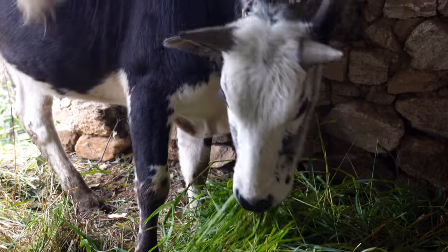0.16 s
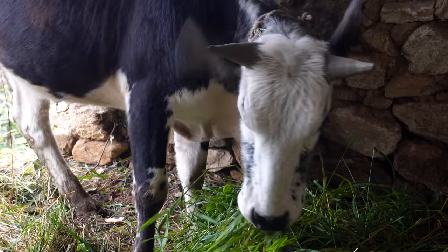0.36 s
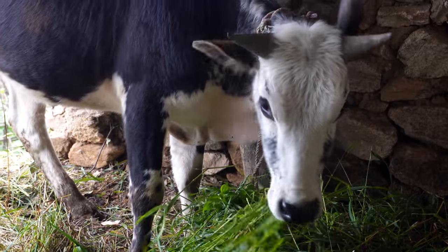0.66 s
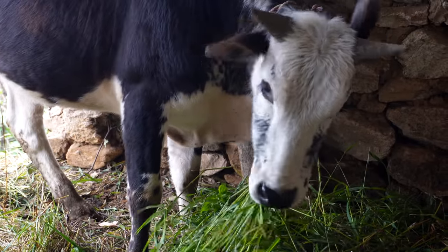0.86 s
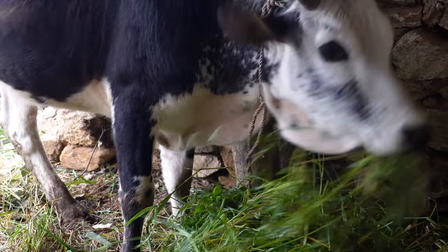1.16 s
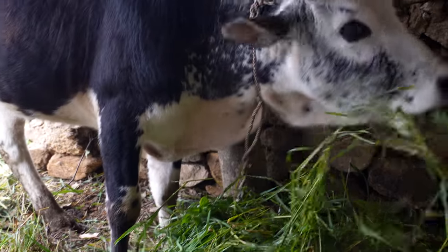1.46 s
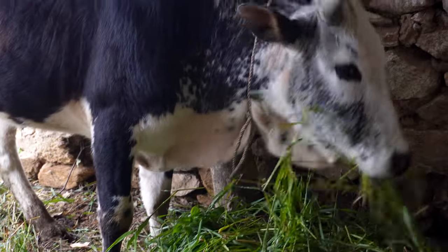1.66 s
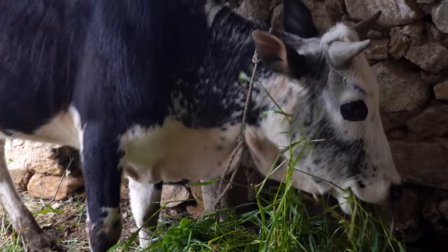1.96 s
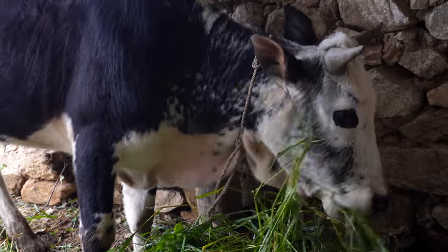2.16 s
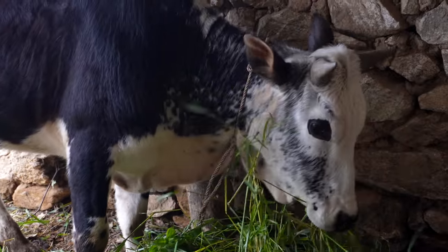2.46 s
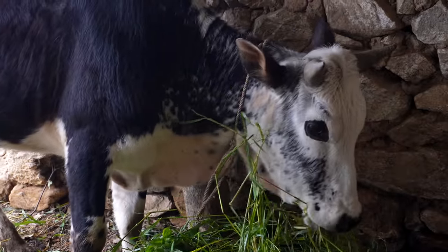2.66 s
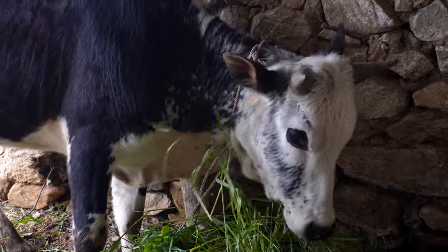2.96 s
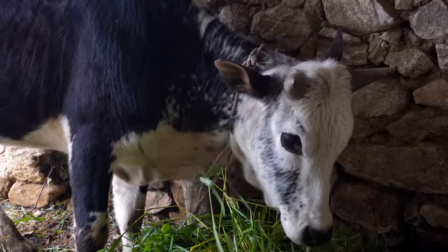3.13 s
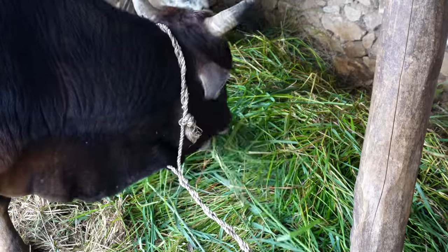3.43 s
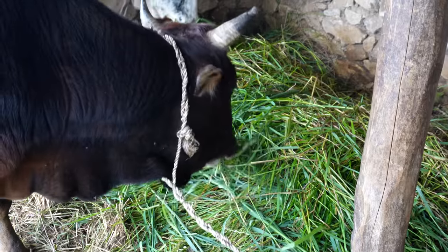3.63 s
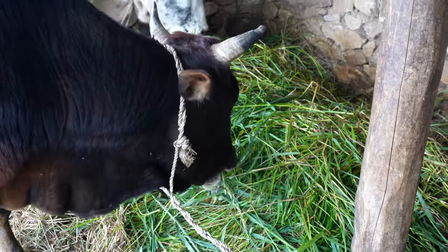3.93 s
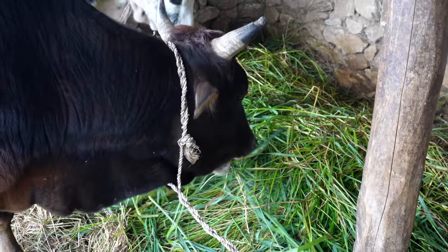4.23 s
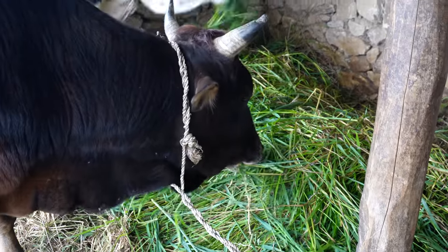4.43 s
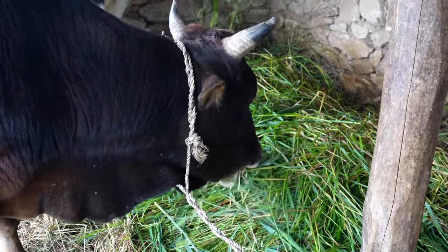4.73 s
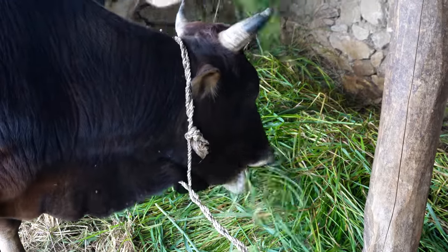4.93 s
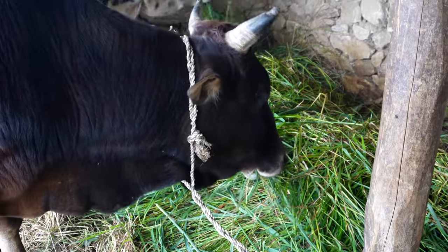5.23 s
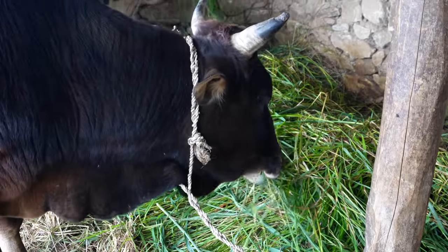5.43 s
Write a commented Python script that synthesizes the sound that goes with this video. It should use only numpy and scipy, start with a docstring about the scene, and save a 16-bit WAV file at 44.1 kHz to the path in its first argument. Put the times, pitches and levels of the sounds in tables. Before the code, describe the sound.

Close up, two cattle feed on fresh-cut grass in turn: crisp rustling, wet-fibre crunching, sharp stalk snaps and tearing crackles in a stone shed.

```python
"""Cattle feeding on cut grass

Two tethered cattle feed, one after the other, on a heap of fresh-cut grass in a stone shed, heard close up.
Muzzles rustle the blades (dense filtered clicks, force-driven); jaws grind the wad (clicks swelling per bite).
Mouth hollows ring with small crunches; stalks snap, bunches tear and blades flick (resonated clicks).
Soft thuds jolt the heap (resonated noise bursts); ground and walls add a short scatter (decaying noise echoes).
A quick fade down and up joins the two feeding passages.
"""
import sys
import numpy as np
from scipy import signal
from scipy.fft import rfft, irfft
from scipy.io import wavfile

SR = 44100
rng = np.random.default_rng(int(sys.argv[2]) if len(sys.argv) > 2 else 0)


def wrap_up_sound(samples):
    """Save the sound to the file named by the first command line argument, as 16-bit audio."""
    columns = np.atleast_2d(samples).T
    # keep every value between -1 and 1, then stretch to whole-number steps
    tamed = np.clip(columns, -1, 1)
    steps = np.round(tamed * 32767).astype(np.int16)
    wavfile.write(sys.argv[1], SR, steps)


N = 246519
T = np.arange(N) / SR

# All levels are source levels, ahead of the stalk colour, lull, shed, splice fade and output filter.
# soft bumps in the heap: (time [s], peak [dB], pitch [Hz])
HEAP_BUMPS = [(0.778, -63.5, 130), (1.068, -55, 200), (1.085, -81, 60)]
# single blades whipping free: (time [s], level [dB], pitch [Hz])
BLADE_FLICKS = [ (0.198, -41.5, 9000), (0.348, -41, 6600), (0.571, -41, 7500), (0.662, -39, 8450),
                (0.695, -38, 6000), (1.7215, -44.5, 8540), (2.455, -44, 4700), (2.669, -43, 6850),
                (3.2825, -37, 6900), (4.080, -38, 6500), (4.545, -37, 10500), (4.780, -37, 7500), ]
# bunches giving way: (first strain [s], level [dB], build-up [s], pitch [Hz], width [Hz])
BUNCH_TEARS = [ (0.556, -36.5, 0.021, 1770, 2000), (0.623, -38, 0.0088, 4020, 3000),
               (0.757, -35, 0.015, 4250, 750), (1.785, -36, 0.027, 1250, 1000),
               (1.787, -44.5, 0.01, 423, 200), (1.792, -38, 0.024, 3900, 4000),
               (3.6, -35, 0.022, 4370, 3000), (4.695, -37.5, 0.038, 3500, 1000),
               (5.327, -41, 0.011, 1060, 700), ]
# stalks breaking: (time [s], click peak [dB], pitch [Hz], width [Hz],
#                   fibre crackle re click peak [dB], crackle decay [s])
STALK_SNAPS = [ (0.4117, -25, 1700, 2400, -6.5, 0.0087), (0.489, -24.5, 4500, 4970, -11, 0.0087),
               (0.626, -28, 1900, 1500, -7, .003), (0.7285, -28, 1600, 2400, -8, 0.009),
               (0.769, -21, 4220, 600, -16, 0.0035), (0.8068, -24, 2670, 2000, -15, .002),
               (0.9165, -31, 1036, 70, -6, 0.011), (0.9166, -25, 2090, 100, -11, .004),
               (1.009, -37.5, 1330, 1000, 2, 0.011), (1.259, -30.5, 3170, 600, -7, .008),
               (1.550, -28, 2230, 1200, -7, 0.0037), (1.622, -26.5, 2000, 2000, -6.5, 0.0054),
               (1.847, -26, 3020, 2000, -5, .004), (1.9168, -23, 3100, 2200, -9.5, 0.0079),
               (2.008, -31, 1590, 900, -8, .006), (2.375, -34, 1360, 590, -8, 0.0081),
               (2.477, -31, 1900, 1190, -5, .004), (2.550, -23, 2900, 2200, -15, 0.0065),
               (2.578, -22, 3000, 3000, -14, 0.0036), (2.6215, -18, 2200, 2600, -6, 0.0014),
               (2.631, -27, 2000, 1700, -7, 0.01), (3.6205, -18, 4380, 1300, -12, .004),
               (3.7324, -27.5, 1130, 900, -2.5, 0.0052), (3.8823, -26.5, 1340, 260, -8.5, 0.013),
               (3.8824, -24.5, 2700, 600, -11, 0.007), (4.2245, -22, 4600, 2600, -7, 0.018),
               (4.323, -20, 4100, 2500, -11, 0.0033), (4.693, -26, 3360, 1800, -9, 0.0033),
               (4.821, -34.5, 1370, 500, -2.5, .011), (5.269, -34, 2070, 1500, -8, .005),
               (5.4992, -25.5, 2300, 2400, -5.5, 0.0059), (5.5045, -29, 1900, 1400, -9.5, .006), ]
# strokes ringing one mouth hollow: (time [s], length [s], level [dB], pitch [Hz], width of a crunch [Hz],
#                                    pitch glide over the stroke [share])
MOUTH_MUNCHES = [ (0.164, 0.23, -50, 1270, 620, -0.073), (1.612, 0.21, -50, 1550, 600, -0.26),
                 (2.362, 0.12, -53, 1290, 400, 0.017), (2.702, 0.69, -56.5, 3200, 450, -0.037),
                 (3.104, 0.13, -51, 1280, 300, 0.02), (3.285, 0.49, -63.5, 410, 80, -0.52),
                 (3.614, 0.12, -52.5, 1040, 300, -.1), (4.138, 0.26, -68.5, 374, 110, -0.37),
                 (5.147, 0.11, -58, 446, 110, 0.25), (5.149, 0.24, -50.5, 1014, 294, -.1), ]
# jaw closings: (molars meet [s], build-up [s], grinding level [dB], cheek level [dB])
JAW_BITES = [ (0.43, 0.017, -48, -56.5), (0.62, 0.15, -43, -54), (0.752, 0.01, -38.5, -53),
             (1.08, 0.22, -43.5, -61), (1.81, 0.15, -42.5, -55.5), (2.02, 0.033, -49, -67),
             (2.2, 0.057, -50.5, -70), (2.482, 0.045, -41.5, -65), (2.655, 0.14, -42, -58),
             (3.245, 0.14, -48, -76), (3.745, 0.29, -46.5, -59), (3.955, 0.38, -46.5, -64),
             (4.285, 0.23, -47.5, -64), (4.55, 0.28, -48.5, -58.5), (4.98, 0.17, -50, -69),
             (5.355, 0.1, -43, -51), ]
# muzzle pushes: (time [s], length before settling [s], level [dB], crispness [dB], see PUSH_TIP_LIFT_DB)
MUZZLE_PUSHES = [ (0.062, 0.17, -48, -5.5), (0.163, 0.081, -48, -8), (0.3, 0.07, -46.5, -6),
                 (0.546, 0.1, -43, -7.5), (0.638, 0.17, -44.5, -0.5), (1.031, 0.056, -46, -1),
                 (1.098, 0.13, -48.5, 2.5), (1.21, 0.16, -48.5, -2), (1.382, 0.097, -43.5, -4.5),
                 (1.512, 0.15, -46, -9), (1.696, 0.034, -43, -25), (1.767, 0.093, -44, -8.5),
                 (2.012, 0.029, -47, -7), (2.132, 0.082, -43, -5), (2.235, 0.048, -46.5, -5.5),
                 (2.445, 0.067, -46, -20), (2.93, 0.03, -48, -0.5), (3.04, 0.13, -47.5, -8),
                 (3.256, 0.18, -45.5, -1), (3.45, 0.083, -44.5, -7.5), (3.527, 0.11, -42, -3.5),
                 (3.683, .11, -45, -5), (3.86, 0.085, -44.5, -4.5), (4.127, 0.13, -45.5, -4),
                 (4.248, 0.082, -42.5, -2.5), (4.497, 0.073, -42.5, 0), (4.575, 0.16, -46.5, -1),
                 (4.731, 0.13, -42, -6), (4.874, 0.23, -41.5, -3), (5.115, 0.18, -43, -5.5),
                 (5.318, 0.042, -39.5, -11), (5.343, 0.042, -46.5, 4.5), (5.481, 0.052, -46.5, -2), ]
# spectral outline of the rubbing blades: (frequency [Hz], level [dB])
BLADE_COLOUR = [(200, -53.5), (700, -15.5), (1200, -9), (2000, -2), (3100, 0), (4500, -1), (6500, -8),
                (9000, -23.5), (15000, -28)]
# spectral outline of the crisp blade tips: (frequency [Hz], level [dB])
TIP_COLOUR = [(2000, -69), (4500, -1.5), (7000, -0.5), (9000, -3), (11000, -5), (13000, -9), (16000, -12)]
# spectral outline of the wad between the molars: (frequency [Hz], level [dB])
GRIND_COLOUR = [(100, -57), (300, -34), (650, -13.5), (850, -5), (1050, 0), (1300, 0.5), (1750, -0.5),
                (2300, -3.5), (3500, -4.5), (9000, -30)]
# spectral outline of what the cheeks pass: (frequency [Hz], level [dB])
CHEEK_COLOUR = [(25, -42), (60, -37), (120, -27), (200, -14.5), (300, -8.5), (420, -0.5), (620, 0.5),
                (900, -0.5), (2000, -32.5), (6000, -67)]

GROUND_ECHO_S, GROUND_ECHO_DB = 0.0042, -19  # a snap comes back off the ground
FLICK_DECAY_S = 0.017
CRUNCH_SPREAD_DB, CRUNCH_SCATTER = 4, 0.058  # spread of strength, and of pitch as a share
BITE_RELEASE_S = 0.026
GRIND_DB, CHEEK_DB = -52, -61  # the wad rolling in the mouth between bites
SLIP_DECAY_S, BLADE_RING_Q = 0.0096, 5  # one blade's run of clicks, and how sharply it rings
PUSH_ATTACK_S, PUSH_SETTLE_S = 0.016, 0.027  # blades take up the push, then spring back
PUSH_TIP_LIFT_DB = 2.5  # tip level = push or haul level + crispness + this
# a mouthful hauled out of the heap: hardest pull, 1/e widths, level, crispness
HAUL_AT_S, HAUL_BUILD_S, HAUL_FADE_S = 4.445, 0.096, 0.082
HAUL_DB, HAUL_CRISP_DB = -36.5, 0
# constant stirring in each feeding passage: (blade level [dB], tips re blades [dB])
FIRST_STIR, SECOND_STIR = (-48.5, -4), (-46, -2.4)
# the rustle quietens once a bunch has come free
LULL_S, LULL_WIDTH_S, LULL_DB = 1.897, 0.024, -7
# a quick fade down and up at the splice between the two feeding passages
SPLICE_S, SPLICE_FADE_S, SPLICE_GAIN = 3.269, 0.008, 0.15
TOP_HZ = 15800


def undb(db):
    """Decibels to gain."""
    return 10 ** (np.asarray(db) / 20)


def unit(x):
    """Scale to rms 1."""
    return x / np.sqrt(np.mean(x ** 2) + 1e-18)


def colour(x, points):
    """Minimum-phase filter with the given (Hz, dB) outline, built by folding the cepstrum."""
    hz, db = np.transpose(points)
    size = 2048
    grid_hz = np.maximum(np.arange(size // 2 + 1) * SR / size, 1)
    outline_db = np.interp(np.log(grid_hz), np.log(hz), db)
    cepstrum = irfft(np.log(undb(outline_db)))
    cepstrum[1:size // 2] *= 2
    cepstrum[size // 2 + 1:] = 0
    impulse = irfft(np.exp(rfft(cepstrum)))
    return signal.fftconvolve(x, impulse)[:len(x)]


def resonate(x, hz, width_hz):
    """A resonance applied twice, for steep skirts; each pass is wider to keep the nominal width."""
    pass_width_hz = min(1.5 * width_hz, SR / 4)
    b, a = signal.iirpeak(min(hz, SR / 3), hz / pass_width_hz, fs=SR)
    return signal.lfilter(b, a, signal.lfilter(b, a, x))


def add(out, s, x):
    """Mix a sound in at time s."""
    i = max(int(s * SR), 0)
    out[i:i + len(x)] += x[:N - i]


def fractures(per_s, spread_db, size=N):
    """Tiny clicks of either sign at random moments, their strengths spread in dB; rms 1."""
    hit = rng.random(size) < per_s / SR
    strength = undb(spread_db * np.minimum(rng.standard_normal(size), 2))
    return unit(hit * strength * np.sign(rng.standard_normal(size)))


def clumps(per_s, decay_s, depth):
    """One blade slipping sets off its neighbours: sudden rises that die away, on a steady base."""
    kicks = (rng.random(N) < per_s / SR) * np.minimum(rng.exponential(size=N), 2.5)
    rises = signal.lfilter([1], [1, -np.exp(-1 / (decay_s * SR))], kicks)
    return unit(1 + depth * rises)


def pop(t, hz, width_hz):
    """One fracture: a ring that starts at once and dies quickly."""
    return np.sin(2 * np.pi * hz * t) * np.exp(-np.pi * width_hz * t)


def shed(x, count=14):
    """Ground and stone walls return a short, dull scatter; its pattern crossfades as the head moves."""
    t, wet = T[:SR // 4], 0
    for k in range(count):
        place = np.cos(np.pi / 2 * np.clip(T / T[-1] * (count - 1) - k, -1, 1))
        tail = rng.standard_normal(len(t)) * undb(-60 * t / 0.11) * (t > 0.003)
        tail = colour(tail, [(100, -3.5), (1200, -8.5), (4000, -7.0), (15000, -10.0)])
        tail = unit(tail) / np.sqrt(len(t))  # unit energy
        wet = wet + signal.oaconvolve(x * place, tail)[:N]
    return x + undb(-15.5) * wet


def bumps():
    """The muzzle lands softly in the heap and jolts it: noise bursts in a broad low resonance."""
    out, t = np.zeros(N), T[:SR // 4]
    for s, db, hz in HEAP_BUMPS:
        thud = resonate(rng.standard_normal(len(t)) * np.exp(-t / 0.02), hz, hz)
        add(out, s, undb(db) * thud / np.abs(thud).max())
    return out


def flicks():
    """A blade whips free: one sharp tick, then a bright run of clicks that dies away."""
    out, t = np.zeros(N), T[:SR // 12]
    for s, db, hz in BLADE_FLICKS:
        clicks = fractures(3500, 2, size=len(t))
        clicks[0] = 4  # the tick
        ringing = unit(resonate(clicks, hz, hz / 2))
        add(out, s, undb(db) * np.exp(-t / FLICK_DECAY_S) * ringing)
    return out


def tears():
    """Fibres fail harder as a bunch is strained, and stop when it comes free."""
    out, t = np.zeros(N), T[:SR // 6]
    for s, db, build_s, hz, width_hz in BUNCH_TEARS:
        build = np.minimum(t / build_s, 1) ** 0.25
        release = np.exp(-np.maximum(t - build_s, 0) / 0.005)
        fibres = unit(resonate(fractures(2200, 2.5, size=len(t)), hz, width_hz))
        add(out, s, undb(db) * build * release * fibres)
    return out


def snaps():
    """A stalk breaks with one sharp click, which the ground returns; its last fibres crackle and fade."""
    out, t = np.zeros(N), T[:SR // 8]
    for s, db, hz, width_hz, fibres_db, decay_s in STALK_SNAPS:
        click = resonate(pop(t, hz, width_hz), hz, max(hz, width_hz))
        click = undb(db) * click / np.abs(click).max()
        fade = np.exp(-t / decay_s) * (t > 0.0015)
        fibres = resonate(fractures(4000, 2.5, size=len(t)) * fade, hz, width_hz)
        fibres *= np.linalg.norm(fade) / np.linalg.norm(fibres)  # same energy as the fade
        add(out, s, click + undb(db + fibres_db) * fibres)
        add(out, s + GROUND_ECHO_S, undb(GROUND_ECHO_DB) * click)
    return out


def stalks():
    """Snaps, tears and flicks together; thin stalks radiate next to no bass."""
    return colour(snaps() + tears() + flicks(), [(60, -39), (200, -21), (450, -1.5), (16000, -1.0)])


def munches():
    """Small crunches ring one mouth hollow, whose pitch glides as jaw and tongue reshape it."""
    out, t = np.zeros(N), T[:SR // 50]
    for s, length_s, db, hz, width_hz, glide in MOUTH_MUNCHES:
        wad, crunches = np.zeros(N), int(800 * length_s)
        parts = rng.random(crunches)  # position within the stroke, 0 to 1
        scatter = np.clip(rng.standard_normal((crunches, 2)), -2, 1.5)
        for part, (size, detune) in zip(parts, scatter):
            pitch_hz = hz * (1 + glide * (part - 0.5) + CRUNCH_SCATTER * detune)
            gain = np.sin(np.pi * part) ** 0.5 * undb(CRUNCH_SPREAD_DB * size)
            add(wad, part * length_s, gain * pop(t, pitch_hz, width_hz / 2))
        stroke = wad[:int(length_s * SR) + len(t)]
        add(out, s, undb(db) * unit(resonate(stroke, hz, hz)))
    return out


def squeeze(s, build_s):
    """One bite: pressure grows exponentially until the molars meet, then drops."""
    return np.exp(np.minimum((T - s) / build_s, (s - T) / BITE_RELEASE_S))


def chewing(slips):
    """Molars crush the wad inside the mouth; the cheeks pass a dull, hollow part of it."""
    grind_power, cheek_power = undb(GRIND_DB) ** 2, undb(CHEEK_DB) ** 2
    for s, build_s, grind_db, cheek_db in JAW_BITES:
        pressure = squeeze(s, build_s)
        grind_power = grind_power + (undb(grind_db) * pressure) ** 2
        cheek_power = cheek_power + (undb(cheek_db) * pressure) ** 2
    grind = unit(colour(fractures(3000, 3.7) * clumps(69, 0.0048, 0.2), GRIND_COLOUR))
    cheeks = unit(colour(fractures(2200, 3.5) * slips, CHEEK_COLOUR))
    return np.sqrt(grind_power) * grind + np.sqrt(cheek_power) * cheeks


def swell(s, length_s):
    """One push: a quick rise, a hold, and a fade as the blades settle."""
    rise = np.clip((T - s) / PUSH_ATTACK_S, 0, 1)
    return rise * np.exp(-np.maximum(T - s - length_s, 0) / PUSH_SETTLE_S)


def haul():
    """The long pull swells to its peak and ebbs as the blades slide free."""
    width_s = np.where(T < HAUL_AT_S, HAUL_BUILD_S, HAUL_FADE_S)
    return undb(HAUL_DB) * np.exp(-((T - HAUL_AT_S) / width_s) ** 2)


def lull():
    """Gain dip of the rustle after a bunch gives way."""
    return undb(LULL_DB * np.exp(-((T - LULL_S) / LULL_WIDTH_S) ** 4))


def crackle(count=3400):
    """Blades of many sizes: each slips in a short run of clicks and rings at its own pitch."""
    out, t = np.zeros(N), T[:SR // 70]
    hits = rng.random((count, len(t))) < 1100 / SR
    runs = hits * rng.choice([-1, 1], (count, len(t))) * np.exp(-t / SLIP_DECAY_S)
    runs[:, 0] = 1
    for run, (when, size) in zip(runs, rng.random((count, 2))):
        hz = 900 * (14500 / 900) ** size  # 900 to 14500 Hz, log-uniform
        add(out, when * T[-1], resonate(run, hz, hz / BLADE_RING_Q))
    return unit(out)


def rustle(slips):
    """Blades rub and crack; harder pushing makes them louder, and their tips add the crisp top."""
    stir_db, stir_crisp_db = (np.where(T < SPLICE_S, a, b) for a, b in zip(FIRST_STIR, SECOND_STIR))
    blade_power, tip_power = undb(stir_db) ** 2, undb(stir_db + stir_crisp_db) ** 2
    forces = [(undb(db) * swell(s, length_s), crisp_db) for s, length_s, db, crisp_db in MUZZLE_PUSHES]
    forces.append((haul(), HAUL_CRISP_DB))
    for force, crisp_db in forces:
        blade_power = blade_power + force ** 2
        tip_power = tip_power + (force * undb(crisp_db + PUSH_TIP_LIFT_DB)) ** 2
    # hard cracks span all pitches, soft ones ring in a single blade
    ringing = crackle()
    blade_cracks = fractures(5200, 2.5) + undb(-7) * ringing
    tip_cracks = fractures(9000, 1.7) + undb(-8.5) * np.roll(ringing, N // 2)  # rolled to decorrelate
    blades = unit(colour(blade_cracks * slips, BLADE_COLOUR))
    tips = unit(colour(tip_cracks * slips, TIP_COLOUR))
    return np.sqrt(blade_power) * blades + np.sqrt(tip_power) * tips


def scene():
    """All the feeding sounds in the shed, on two equal channels."""
    slips = clumps(100, 0.011, 0.13)  # shared by blades and cheeks
    feeding = lull() * rustle(slips) + chewing(slips) + munches() + stalks() + bumps()
    splice_fade = np.clip(np.abs(T - SPLICE_S) / SPLICE_FADE_S, SPLICE_GAIN, 1)
    return np.tile(shed(feeding) * splice_fade, (2, 1))


def record(dry):
    """A steep elliptic low-pass cuts the top."""
    return signal.sosfilt(signal.ellip(10, 0.1, 70, TOP_HZ, fs=SR, output="sos"), dry)


dry = scene()
out = record(dry)
wrap_up_sound(out)
```